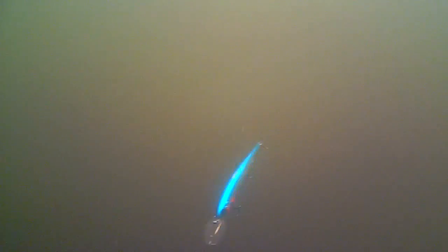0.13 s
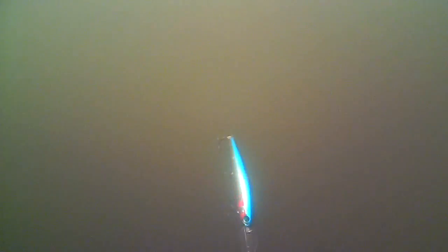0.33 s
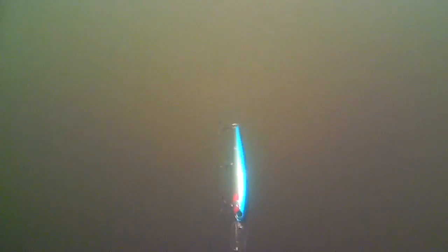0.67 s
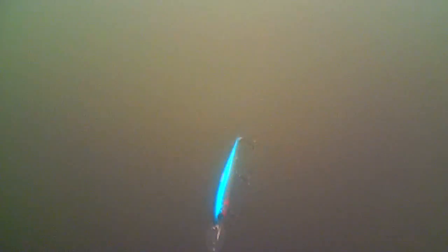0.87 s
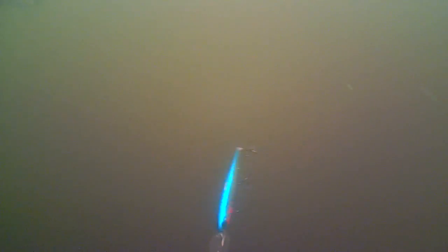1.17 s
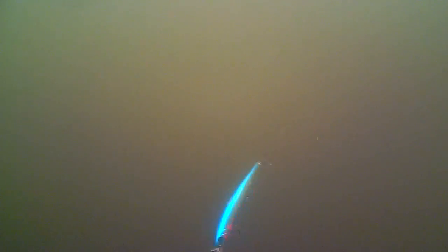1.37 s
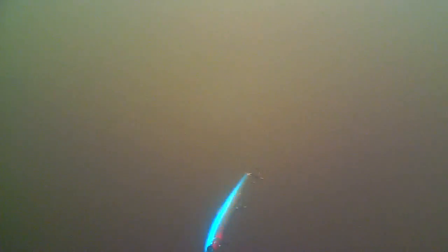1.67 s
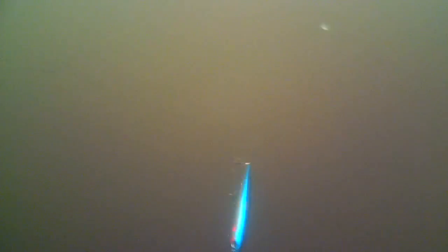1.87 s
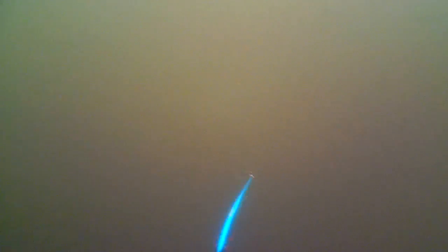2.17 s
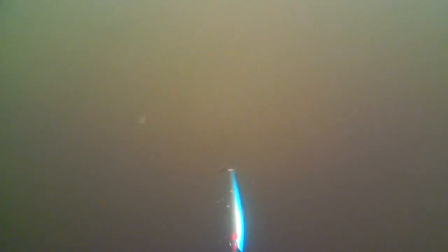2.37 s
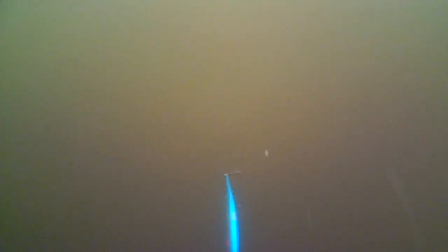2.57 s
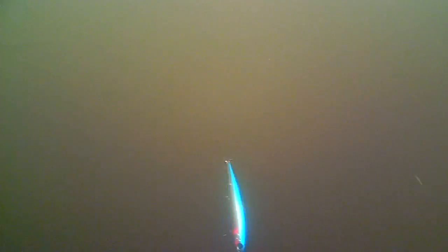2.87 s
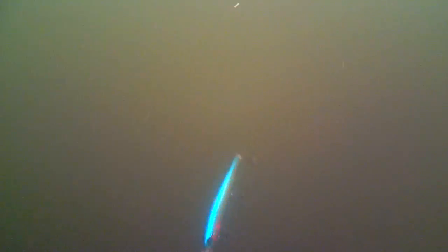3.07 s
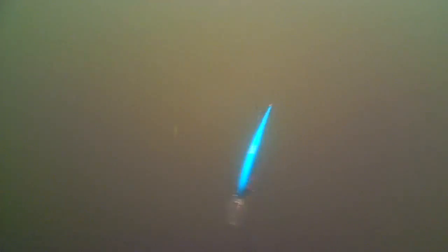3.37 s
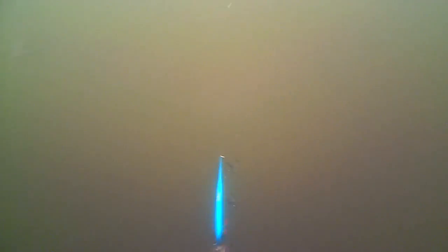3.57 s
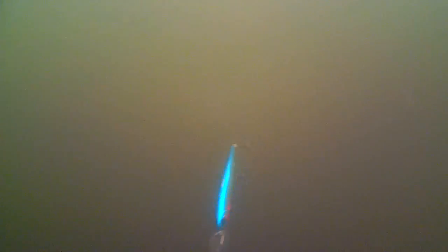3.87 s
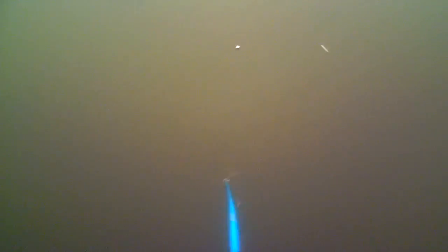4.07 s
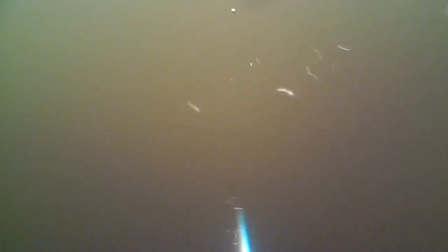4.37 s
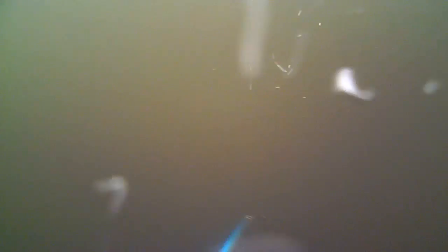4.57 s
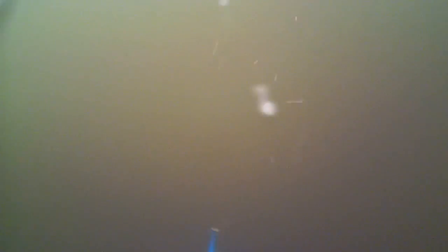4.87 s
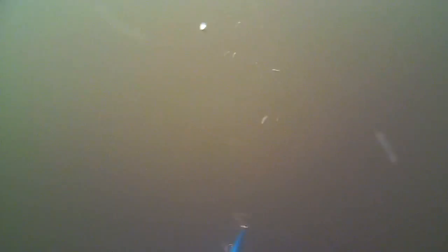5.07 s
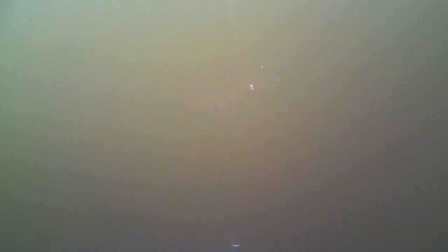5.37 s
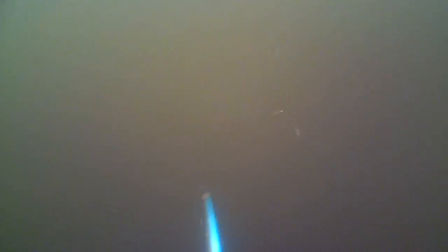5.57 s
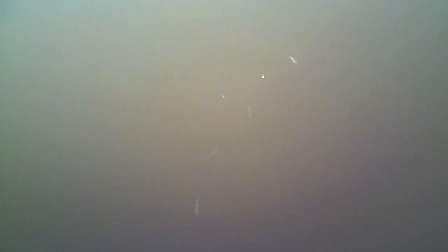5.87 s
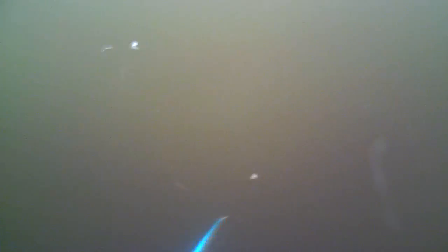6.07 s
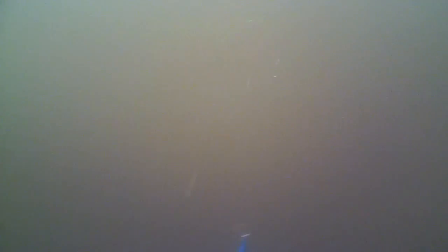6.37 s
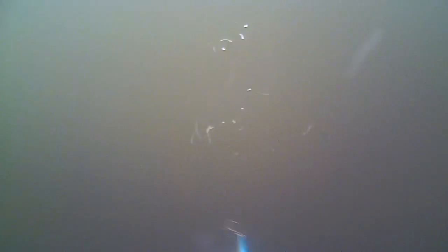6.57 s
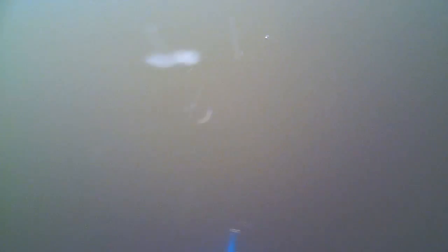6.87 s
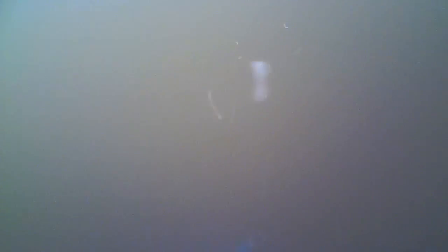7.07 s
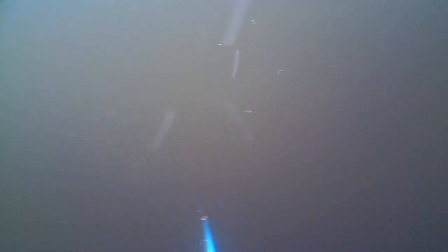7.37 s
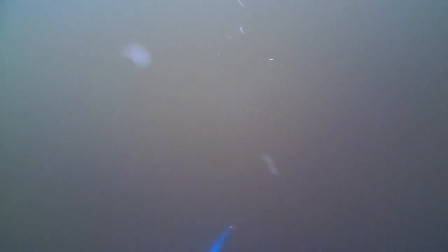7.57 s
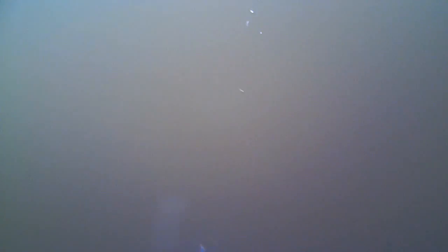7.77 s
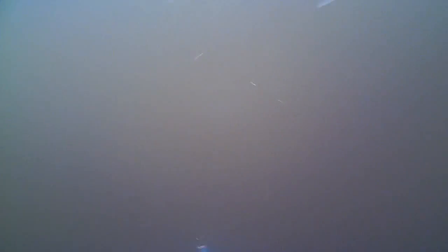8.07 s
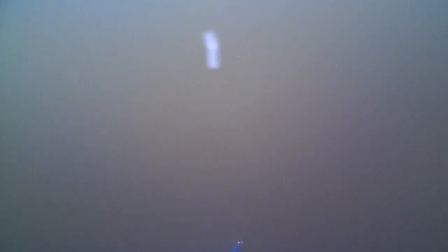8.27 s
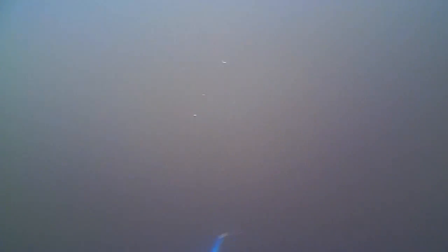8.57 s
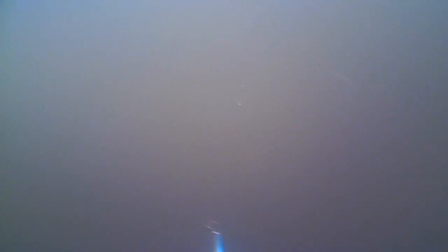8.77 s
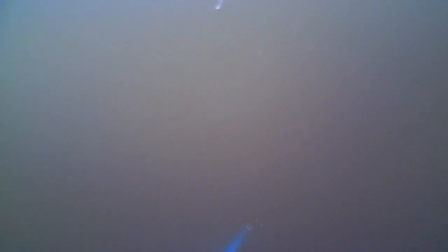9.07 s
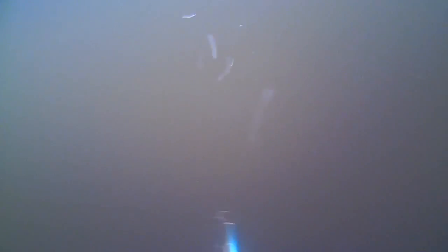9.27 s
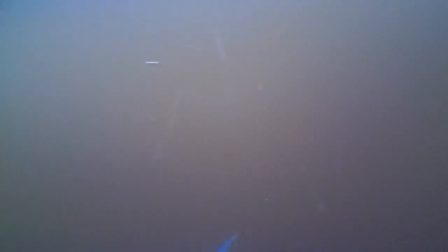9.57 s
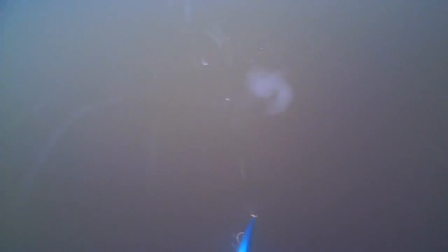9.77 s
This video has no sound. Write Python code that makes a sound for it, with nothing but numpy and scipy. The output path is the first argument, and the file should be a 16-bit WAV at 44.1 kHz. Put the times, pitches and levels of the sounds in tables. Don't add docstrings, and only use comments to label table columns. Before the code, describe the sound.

For the first four seconds, dry bright ticks, about seven per second, sound against a small hard shell with faint hiss and little else. Sharp loud knocks follow, then the tow speeds up: dense rattling, a fluttering nasal whine that comes and goes, short rising whistles, thin bubble spray and soft low water surges. The sound is close, muffled in space, without open-air echo.

```python
import sys
import numpy as np
from scipy import signal
from scipy.fft import rfft, irfft
from scipy.io import wavfile
from scipy.ndimage import uniform_filter1d

SR = 44100
rng = np.random.default_rng(int(sys.argv[2]) if len(sys.argv) > 2 else 0)


def voltage_ratio(decibels):
    exponent = np.asarray(decibels, float) / 20
    return 10 ** exponent


def master(y):
    cut = np.clip(np.atleast_2d(y).T, -1, 1)
    pcm = np.round(cut * 32767)
    wavfile.write(sys.argv[1], SR, pcm.astype(np.int16))


N = 437472

# start_s, pull_db (pull on the line as squeal level), shake_db (shaking of the rings)
TOW = [(3.9, -62, -42), (4.12, -52, -38.5), (4.23, -38.5, -40), (5.0, -34, -42.5), (5.241, -46, -44.5),
       (5.47, -31, -37), (5.7, -56, -45.5), (6.29, -62, -45), (6.4, -30, -38.5), (7.35, -29.5, -41),
       (7.65, -36.5, -44.5), (7.9, -33.5, -41), (8.12, -42, -40.5), (8.43, -29, -42), (8.61, -40.5, -42),
       (9.201, -31, -41.5), (9.6, -35.5, -40.5), (9.78, -31, -34)]
# start_s, rate (tugs per s)
PACE = [(4.05, 15.75), (5.119, 14.54), (5.336, 11.56), (5.393, 19.28), (5.706, 9.65), (6.264, 10.79),
        (6.419, 19.6), (6.495, 17.95), (7.459, 16.07), (7.485, 13.45), (7.946, 15.3), (8.011, 12.05),
        (8.378, 17.15), (8.615, 11.52), (8.686, 15.3), (9.428, 17.11), (9.552, 12.5), (9.622, 18.36)]


def rms_one(x):
    return x / np.sqrt(np.mean(x ** 2) + 1e-20)


def at_hz(points, hz):
    curve_hz, curve_db = np.transpose(points)
    return np.interp(np.log(hz), np.log(curve_hz), curve_db)


def in_time(s, values):
    return np.interp(np.arange(N) / SR, s, values)


def drift(rate):
    r = np.exp(-16 * np.pi * rate / SR)
    settle = 4000
    slow = signal.lfilter([1], [1, -2 * r, r * r], rng.standard_normal(N // 8 + settle + 2))[settle:]
    return np.interp(np.arange(N) / 8, np.arange(len(slow)), rms_one(slow))


def coloured(spectrum):
    hz = np.maximum(np.fft.rfftfreq(N, 1 / SR), 1)
    return rms_one(irfft(rfft(rng.standard_normal(N)) * voltage_ratio(at_hz(spectrum, hz)), N))


def fading(clicks, t60):
    return signal.lfilter([1], [1, -voltage_ratio(-60 / (t60 * SR))], clicks)


def ring(clicks, hz, t60):
    r, w = voltage_ratio(-60 / (t60 * SR)), 2 * np.pi * hz / SR
    return signal.lfilter([0, np.sin(w)], [1, -2 * r * np.cos(w), r * r], clicks + 1e-18)


def soft_ring(clicks, hz, t60):
    def swell(x):
        return ring(ring(x, hz, t60), hz, .005)

    one_click = np.eye(1, 200)[0]
    return swell(clicks) / np.abs(swell(one_click)).max()


def train(s, sizes):
    clicks = np.zeros(N)
    clicks[np.minimum((np.asarray(s) * SR).astype(int), N - 1)] = sizes
    return clicks


def bump(s, half_s):
    t = np.arange(N) / SR - s
    return t, np.cos(np.pi / 2 * np.clip(t / half_s, -1, 1)) ** 2


def turns():
    counted = np.cumsum(in_time(*np.transpose(PACE))) / SR
    first_tug_turns = 1.729
    return counted - counted[int(PACE[0][0] * SR)] - first_tug_turns


def time_of(turn):
    return np.interp(turn, turns(), np.arange(N) / SR)


def in_wobble(column):
    wobble = np.array([(0, 2, -2, 4), (.2, -18.5, -59, 4.5), (.3, -17.5, 11, -7), (.4, -6.5, 13.5, 8),
                       (.6, 12, 5.5, -1.5), (.8, -4, 1, 10.5), (1, 5, 8.5, 8)])
    return np.interp(turns() % 1, wobble[:, 0], wobble[:, column])


def knocks():
    # start_s, peak_db, ring_hz
    hard_knocks = [(.001, -38, 3400), (.003, -46, 1750), (.0054, -39, 4700), (.016, -41, 3400),
                   (1.838, -44, 3600), (1.837, -46, 1780), (1.859, -29.5, 3680), (1.862, -40, 1350),
                   (1.859, -39, 2150), (1.861, -39, 5200), (1.865, -46, 3660), (3.922, -24.5, 7700),
                   (3.922, -43, 1312), (4.102, -22.5, 3100), (4.145, -17, 3610), (4.223, -27, 10040)]
    s, peak_db, _ = np.transpose(hard_knocks)
    crack = signal.lfilter([1, -2, 1], [1, -.3], train(s, voltage_ratio(peak_db - 22)))
    return crack + sum(soft_ring(train([s], voltage_ratio(db)), hz, 0.0053) for s, db, hz in hard_knocks)


def flow(rub_db):
    # start_s, level_db
    surge = [(0.0, -62), (0.38, -68.5), (3.48, -69), (3.619, -75), (3.73, -53.5), (3.92, -67), (6.3, -63.5),
             (6.5, -53), (6.619, -62), (6.8, -48.5), (7.1, -55), (7.399, -58.5), (8.9, -65), (9.27, -51),
             (9.45, -68), (9.7, -50), (9.92, -57)]
    # freq_hz, density_db (per Hz)
    rush_colour = [(350, -57), (600, -25), (978, -10.5), (1290, 5), (2470, -2), (4570, -0.5), (12000, -17),
                   (15600, -59), (22000, -120)]
    band = signal.butter(2, [18, 75], "band", fs=SR, output="sos")
    low = signal.sosfilt(band, rng.standard_normal(N))
    rumble_db = in_time(*np.transpose(surge)) - 1.0 + 2.0 * drift(1.9)
    rush_db = rub_db - 9 + in_wobble(column=3) + 2.5 * drift(40)
    rush = in_time([3.9, 4.1], [0, 1]) * voltage_ratio(rush_db) * coloured(rush_colour)
    return voltage_ratio(rumble_db) * rms_one(low) + rush


def clear_ticks(rattle_db):
    # tick_s, peak_db, lead_s (swivel touches earlier), late_s (rings fall back later)
    swings = [(0.1806, -31.5, 0.018, 0.047), (.308, -30.5, .013, 0.03), (.493, -30.5, 0.016, 0.05),
              (0.6236, -30, 0.0083, .0323), (0.834, -31, 0.018, 0.055), (0.9872, -28.5, 0.011, .031),
              (1.1457, -29, 0.012, 0.034), (1.2612, -26.5, 0.015, 0.032), (1.3901, -28.5, 0.011, .0315),
              (1.512, -28, 0.011, 0.027), (1.6717, -29, 0.013, 0.031), (1.788, -28.5, 0.0048, 0.025),
              (1.9595, -30, 0.014, .0369), (2.087, -29.5, 0.01, 0.026), (2.249, -28.5, 0.013, 0.042),
              (2.3721, -29, 0.0087, 0.024), (2.5248, -27.5, .0125, 0.028), (2.6411, -27, .0113, .0172),
              (2.787, -28, .0125, .0368), (2.909, -28.5, 0.011, 0.024), (3.074, -30.5, .0108, 0.039),
              (3.2277, -33, 0.011, .0163), (3.4814, -35.5, .009, 0.064), (3.696, -32, 0.017, 0.041),
              (3.879, -28, 0.004, .029), (3.9704, -24, 0.0051, 0.022), (4.0599, -20.5, 0.0097, 0.02)]
    # turn (from the tug), over_db (over the shaking)
    swing_out = [(-0.68, 16.5), (-.32, 15), (-0.29, 15)]
    # turn (from the tug), over_db (over the shaking)
    swing_back = [(-.45, 8.6), (-.3, 12), (-.14, 16)]
    # start_s, peak_db
    jerks = [(4.519, -20), (4.6473, -29), (4.7364, -24), (4.9254, -16), (5.5946, -29), (5.7006, -39),
             (5.7801, -32), (5.9868, -22.5), (6.4695, -19), (6.5219, -25), (6.7433, -24), (6.919, -15.5),
             (6.984, -20), (7.0378, -14.5), (7.1549, -18), (7.2765, -18), (7.7519, -29), (7.8884, -27),
             (7.9469, -17), (8.0212, -32), (8.302, -22), (8.3665, -16), (8.434, -19), (8.4939, -17.5),
             (8.5695, -36), (8.7257, -31), (8.958, -24.5), (9.642, -24), (9.7132, -23), (9.7626, -19)]

    s, db, lead, late = np.transpose(swings)
    slow_s = np.r_[s - lead, s, s + .009, s + late, s + late + 0.0083]
    slow_db = np.r_[db - 5, db, db - 7.5, db - 6.5, db - 25.5]

    fast = []
    for tug in range(88):
        fast += [(tug + turn, over_db) for turn, over_db in (swing_back if tug % 2 else swing_out)]
    turn, over_db = np.transpose(fast)
    chance = np.clip(rng.standard_normal((len(turn), 2)), -2, 1.2)
    jitter_turns, scatter_db = .05, 3.4
    fast_s = time_of(turn + jitter_turns * chance[:, 0])
    fast_db = rattle_db[(fast_s * SR).astype(int)] + over_db + scatter_db * chance[:, 1]

    jerk_s, jerk_db = np.transpose(jerks)
    clear_of_jerks = np.abs(fast_s[:, None] - jerk_s + .005).min(axis=1) > .013
    free = clear_of_jerks & (fast_s < (N - 2) / SR)
    s = np.r_[slow_s, fast_s[free], jerk_s]
    db = np.r_[slow_db, fast_db[free], jerk_db]
    order = np.argsort(s)
    return s[order], db[order]


def ticks(rattle_db, rub_db):
    # mode_hz, level_db, t60_s, rub_extra_db (more under rubbing)
    housing = [(1895.3, -17.5, 0.0052, -4), (3457.5, -5, 0.0033, 8), (4533, 1, 0.0081, -18),
               (4900, -10.5, 0.008, -2), (5210, -14, 0.0098, 2.0), (5738, -13.5, 0.0013, 8),
               (6950, -17, 0.006, 2.0), (7700, -33.5, 0.017, 10), (8265, -26, 0.0023, -12),
               (11020, -36, 0.0023, 3.0), (12800, -35, 0.002, 11)]
    s, peak_db = clear_ticks(rattle_db)
    fast = in_time([4.02, 4.06], [0, 1])
    wobble_bright_db = in_wobble(column=2) * fast
    after_pause = np.diff(s, prepend=-1) > .045
    bright_db = np.where(after_pause, 14.0, wobble_bright_db[(s * SR).astype(int)])

    when = np.cumsum(rng.uniform(0.0041, 0.013, 1900))
    when = when[when < N / SR]
    near_tick = uniform_filter1d(train(s, 1.0), size=301)
    when = when[near_tick[(when * SR).astype(int)] < 1e-6]
    at = (when * SR).astype(int)
    shaken = fading(train(s, voltage_ratio(peak_db)), .15)
    slow_rattle = voltage_ratio(-12.0) * shaken[at] * (1 - fast[at])
    fast_rattle = fast[at] * voltage_ratio(rattle_db + in_wobble(column=1) + 10.5)[at]
    scatter_db = 4.0 * np.clip(rng.standard_normal(len(at)), -2, 1)
    rattle = (slow_rattle + fast_rattle) * voltage_ratio(scatter_db)

    s = np.r_[s, when]
    size = np.r_[voltage_ratio(peak_db - 1.5), rattle]
    bright_db = np.r_[bright_db, wobble_bright_db[at] + 4.0]
    grit = (rng.random(N) < 1500 / SR) * fast * voltage_ratio(rub_db + in_wobble(column=3) - 10.0)

    mode_hz, mode_db = np.transpose(housing)[:2]
    share = np.clip((mode_hz - 5000) / 1900, -.3, 1)
    scatter = rng.standard_normal((len(s), len(housing)))
    colour = voltage_ratio(mode_db + share * bright_db[:, None] + 3.5 * scatter)
    colour /= np.sqrt(np.sum(colour ** 2, axis=1, keepdims=True))
    out = 0
    for k, (hz, db, t60, rub_extra_db) in enumerate(housing):
        hits = train(s, size * colour[:, k] * (-1) ** k)
        rubbing = voltage_ratio(db + rub_extra_db) * grit * rng.normal(0, 1, N)
        out = out + soft_ring(hits + rubbing, hz, t60)
    return out


def slips_and_hums():
    # mid_s, level_db
    whistles = [(4.749, -51), (5.08, -40), (5.372, -41), (5.42, -37.5), (6.59, -38), (7.04, -37),
                (7.288, -37), (7.55, -41), (7.765, -42), (7.83, -38), (8.121, -44), (8.189, -41),
                (8.66, -35.5), (8.725, -37), (9.04, -40.5), (9.549, -36)]
    # mid_s, pitch_hz, level_db
    moans = [
        (2.45, 482, -61),
        (2.58, 490, -60),
        (2.71, 522, -65),
        (2.85, 470, -56.5),
    ]
    out = np.zeros(N)
    for s, db in whistles:
        t, swell = bump(s, 0.016)
        out += voltage_ratio(db) * swell * np.sin(2 * np.pi * (2300 * t + 14000 * t ** 2))
    for s, hz, db in moans:
        t, swell = bump(s, 0.033)
        out += voltage_ratio(db) * swell * np.sin(2 * np.pi * hz * t)
    return out


def tugs():
    s = time_of(np.arange(int(turns()[-1]) + 1))
    chance = np.clip(rng.standard_normal((len(s), 2)), -2, 2)
    tow_s, pull_db = np.transpose(TOW)[:2]
    db = np.interp(s, tow_s, pull_db) + 1.6 * chance[:, 0]
    pace_hz = 14.0 * (np.interp(s, *np.transpose(PACE)) - 15.5)
    pull_hz = 9.0 * np.maximum(db + 33, -18)
    return s, (696 + pace_hz + pull_hz) * (1 + .015 * chance[:, 1]), db


def squeal():
    # freq_hz, gain_db
    shell = [(300, -42), (480, -9), (650, -17.5), (900, -22), (1150, -3), (1450, 15), (1800, 11), (2300, 6),
             (3500, 5)]
    overtones = [
        (3, -31.5),
        (4, -15),
    ]
    s, top_hz, top_db = tugs()
    top, level_db = in_time(s, top_hz), in_time(s, top_db)
    wobble = turns()
    skewed = wobble - .06 * (1 - np.cos(2 * np.pi * wobble))
    sag = 1 - .42 * np.abs(np.sin(np.pi * skewed)) ** 1.9
    pitch = top * sag * (1 + .04 * drift(120))
    phase = 2 * np.pi * np.cumsum(pitch) / SR

    lift = np.clip((at_hz(shell, 2 * pitch) + 16) / (at_hz(shell, 2 * top) + 20.7), 0, 1)
    lift = np.minimum(1.3 * lift, 1) ** 1.6
    effort_db = -53.5 + 0.18 * (level_db + 30.5) + 4.0 * np.minimum(drift(21.4), 1)
    second_db = effort_db + lift * (level_db + 3.0 - effort_db)
    second_db = second_db + 3.0 * np.clip(drift(110), -2.5, 1)

    out = voltage_ratio(second_db) * np.sin(2 * phase)
    out += voltage_ratio(effort_db + 12.5 + at_hz(shell, pitch)) * np.sin(phase)
    for multiple, db in overtones:
        overtone_db = effort_db + 9.8 * lift + db + 13.3 * np.minimum(drift(21), 1.5)
        out += voltage_ratio(overtone_db) * np.sin(multiple * phase)
    slips = rng.standard_normal(N) * voltage_ratio(4.3 * drift(27))
    out += voltage_ratio(effort_db - 7.5) * rms_one(ring(slips, 485.0, 0.11))
    out += voltage_ratio(second_db - 15.5) * rms_one(ring(slips, 1514, 0.04))
    return out * in_time([3.93, 4.0, 4.11, 4.15], [0, .4, .5, 1])


def spray(spray_db):
    # start_s, peak_db
    slaps = [(4.2233, -43), (4.5001, -43), (4.8544, -44), (5.6289, -44), (5.9345, -46), (6.3914, -36),
             (6.814, -46), (7.344, -39), (8.3123, -43), (8.8505, -39), (9.3284, -35), (9.4967, -40.5),
             (9.5978, -43), (9.7191, -29)]
    clump = voltage_ratio(7.3 * np.minimum(drift(25), 1.5) + 4.0 * np.cos(2 * np.pi * turns()))
    pop_size = voltage_ratio(9.3 * np.minimum(rng.exponential(1, N), 4)) * rng.choice([-1, 1], N)
    pops = (rng.random(N) < 1500 * clump / SR) * pop_size
    fizz = 0.12 * clump * rng.standard_normal(N)
    steady = in_time([3.9, 4.1], [0, 1]) * voltage_ratio(spray_db - 7.0) * rms_one(pops + fizz)

    s, db = np.transpose(slaps)
    puffs = fading(train(s, voltage_ratio(db - 0.5)) + 1e-18, 0.068)
    puffs = uniform_filter1d(puffs, size=400)
    thin = signal.butter(2, 10500, "high", fs=SR, output="sos")
    return signal.sosfilt(thin, steady + puffs * rng.standard_normal(N))


def scene():
    s, pull_db, shake_db = np.transpose(TOW)
    rattle_db = in_time(s, shake_db)
    effort_db = in_time(s, shake_db + 39.5 + 0.45 * np.maximum(pull_db + 38, -15))
    rub_db = -43 + 0.75 * effort_db
    spray_db = -55.5 + effort_db
    line = knocks() + ticks(rattle_db, rub_db) + slips_and_hums() + squeal()
    water = flow(rub_db) + spray(spray_db)
    return (line + water)[None]


def top_cut(x):
    return signal.sosfilt(signal.butter(12, 16730, fs=SR, output="sos"), x)


def record(dry):
    # freq_hz, density_db (per Hz)
    hiss_colour = [(8.8, -28), (15, -8), (54, -19), (156, -24.5), (2320, -35), (4550, -35), (5580, -39),
                   (14700, -38.5), (16500, -48)]
    peak_limit = 0.23
    rounded = peak_limit * np.tanh(dry / peak_limit)
    hiss = voltage_ratio(-61.5 + 4.5) * coloured(hiss_colour)
    offset = -.0066
    return top_cut(rounded + hiss + offset)


dry = scene()
out = record(dry)
master(out)
```